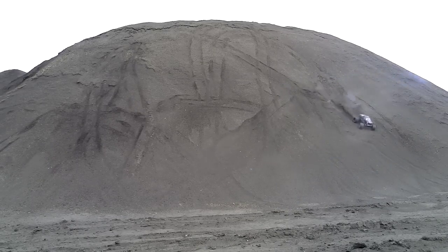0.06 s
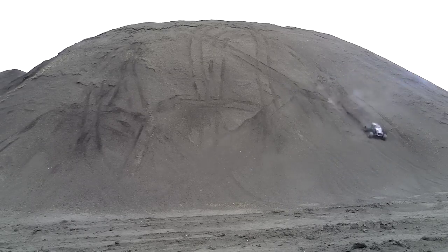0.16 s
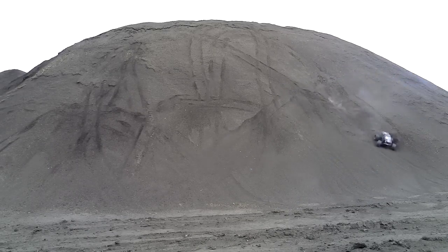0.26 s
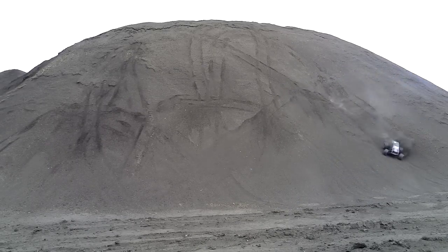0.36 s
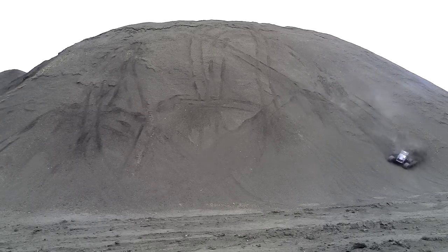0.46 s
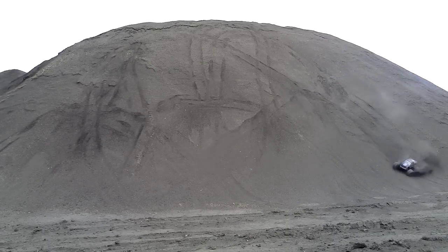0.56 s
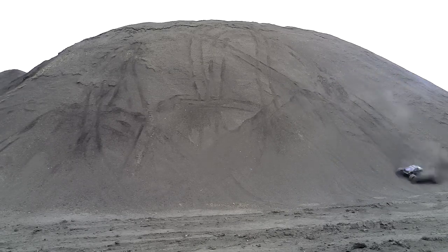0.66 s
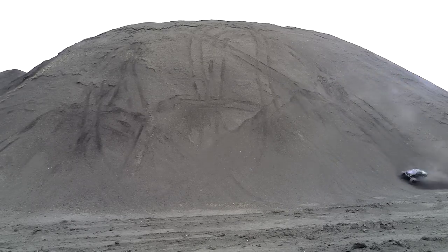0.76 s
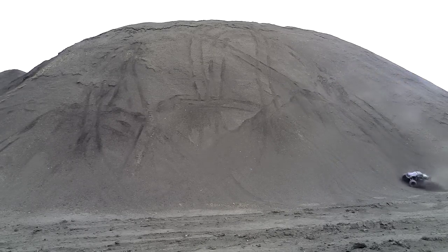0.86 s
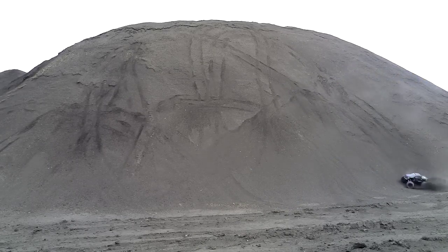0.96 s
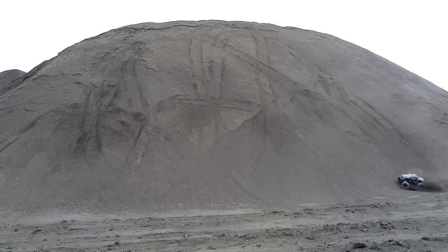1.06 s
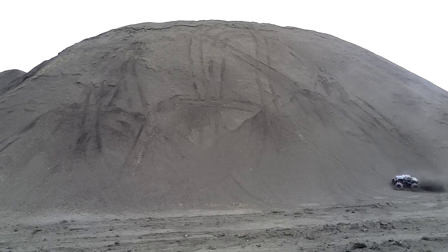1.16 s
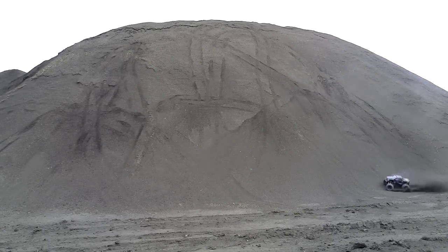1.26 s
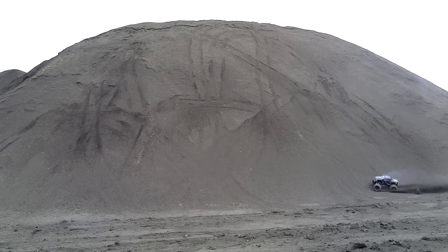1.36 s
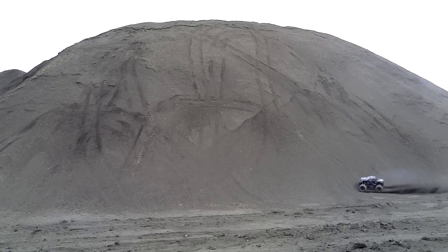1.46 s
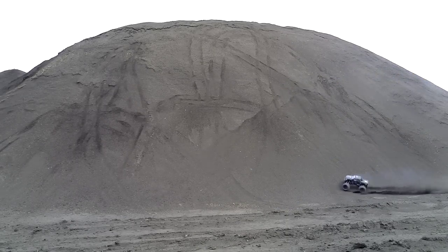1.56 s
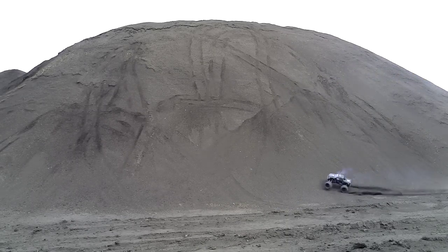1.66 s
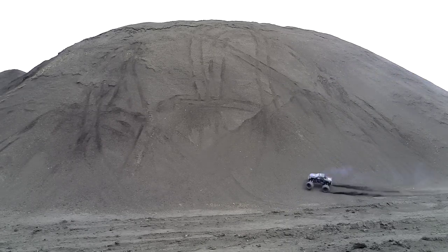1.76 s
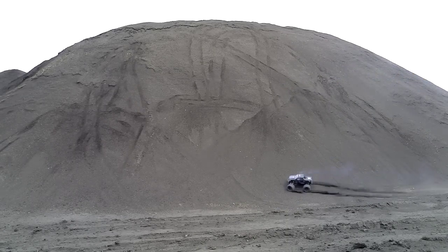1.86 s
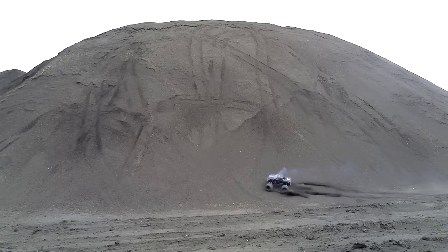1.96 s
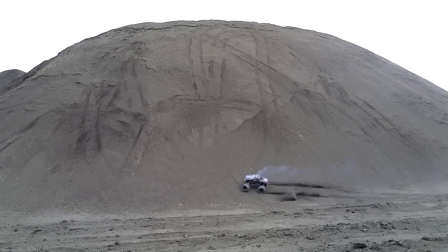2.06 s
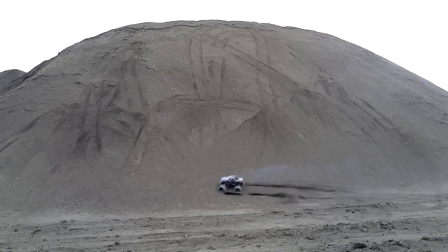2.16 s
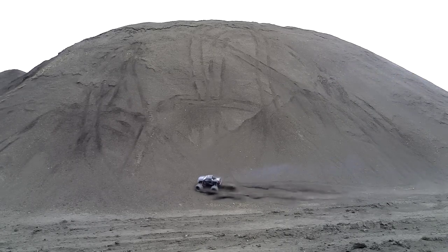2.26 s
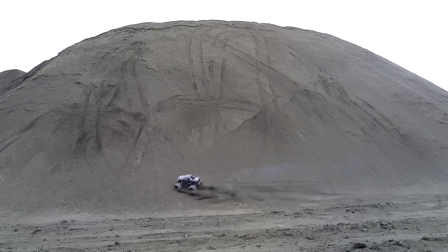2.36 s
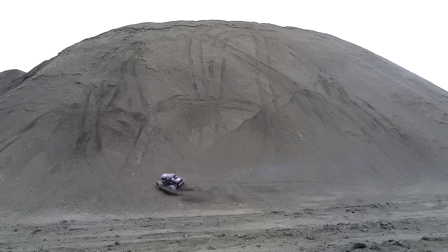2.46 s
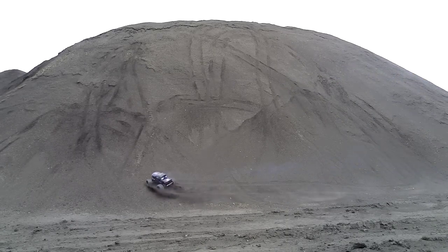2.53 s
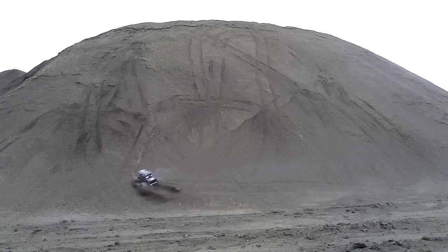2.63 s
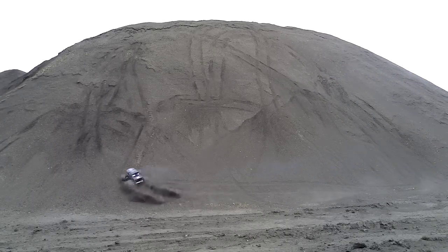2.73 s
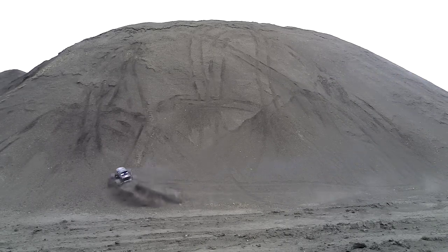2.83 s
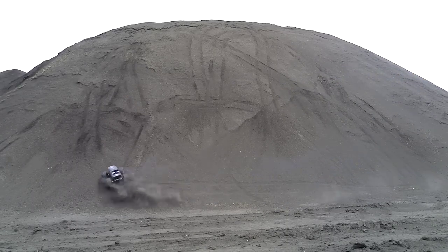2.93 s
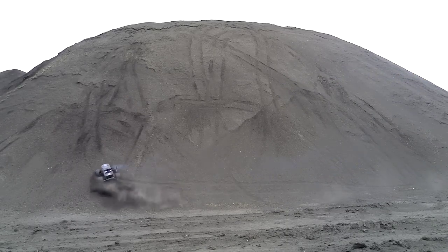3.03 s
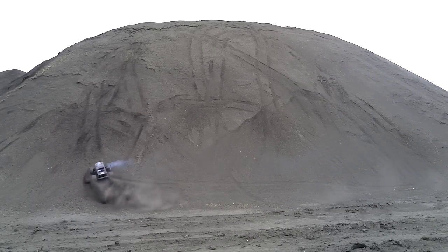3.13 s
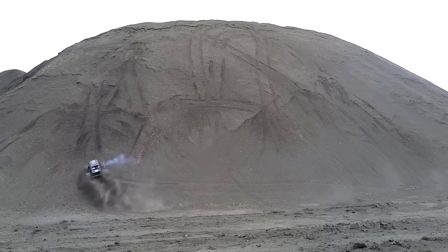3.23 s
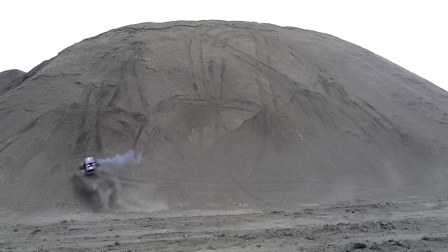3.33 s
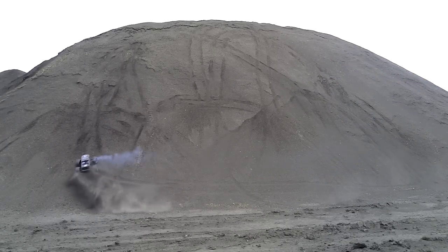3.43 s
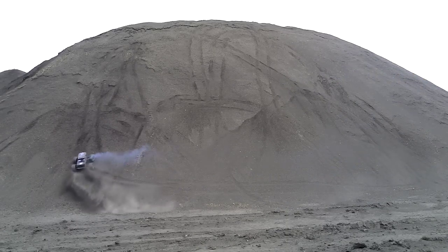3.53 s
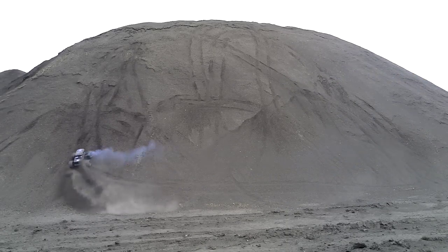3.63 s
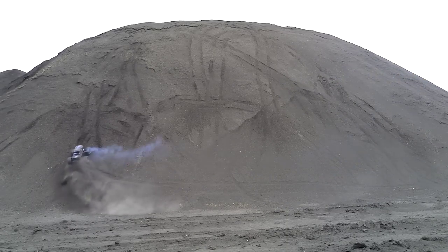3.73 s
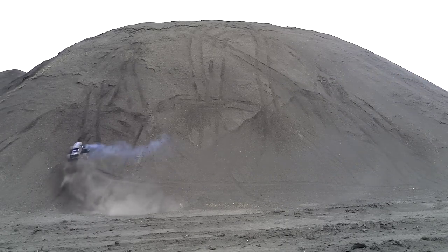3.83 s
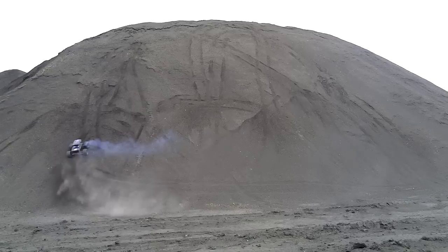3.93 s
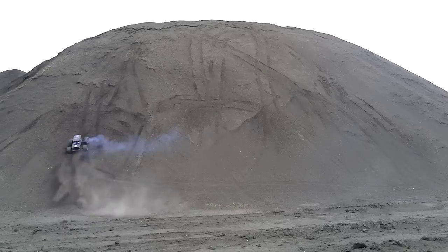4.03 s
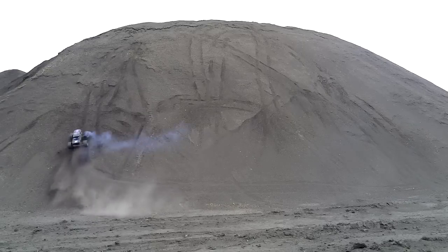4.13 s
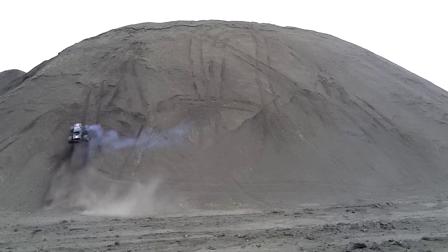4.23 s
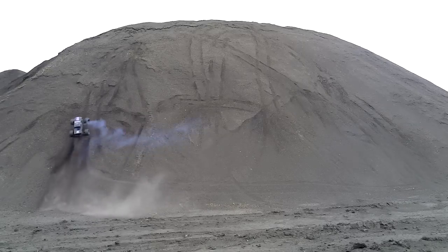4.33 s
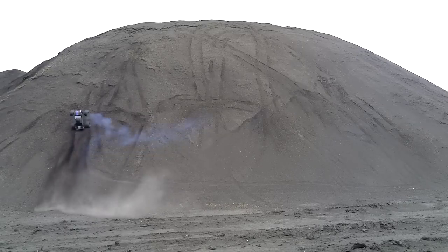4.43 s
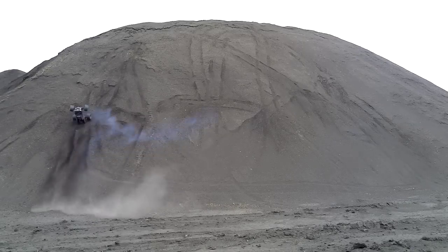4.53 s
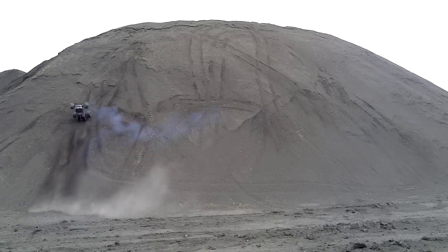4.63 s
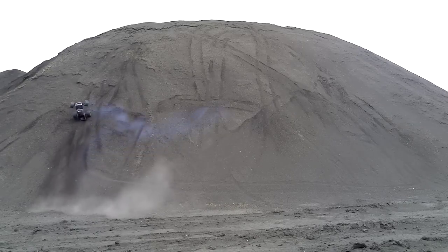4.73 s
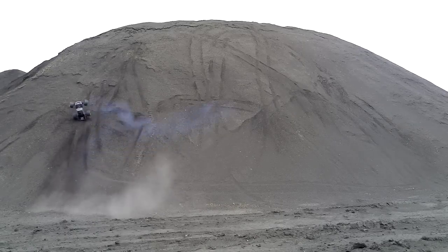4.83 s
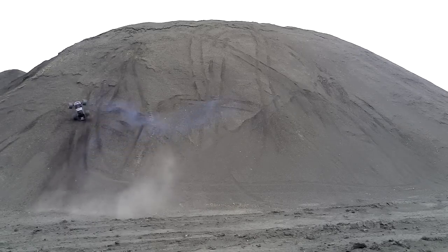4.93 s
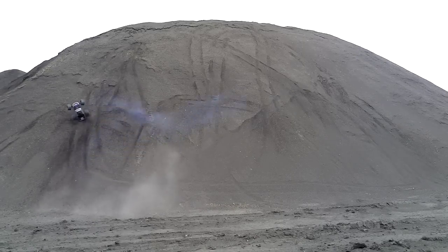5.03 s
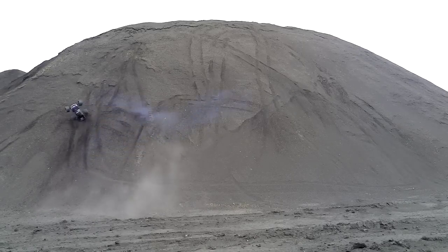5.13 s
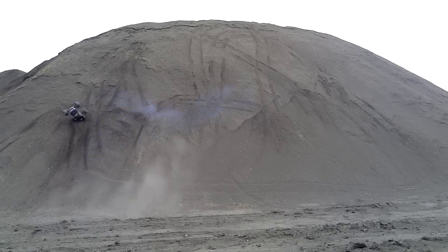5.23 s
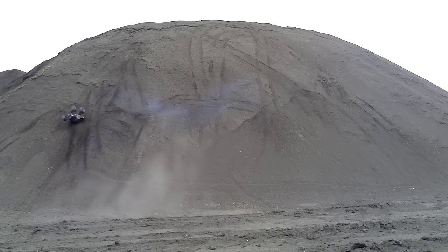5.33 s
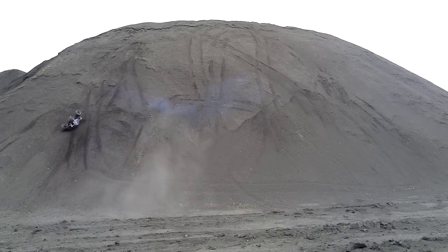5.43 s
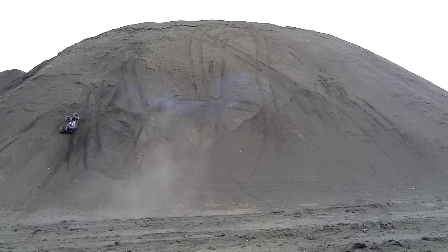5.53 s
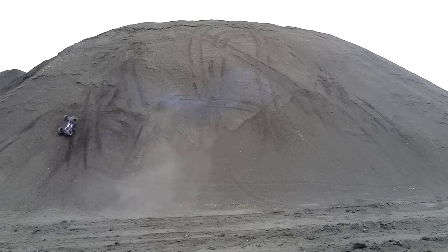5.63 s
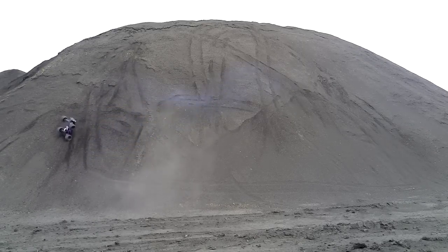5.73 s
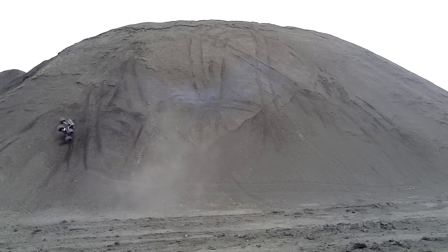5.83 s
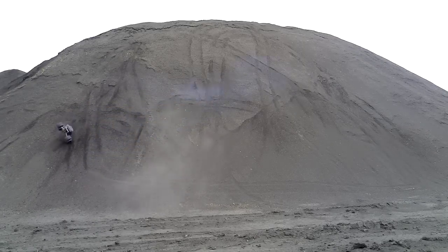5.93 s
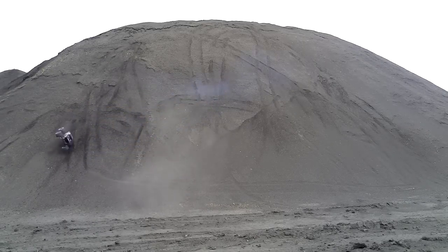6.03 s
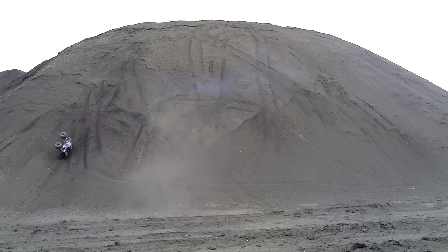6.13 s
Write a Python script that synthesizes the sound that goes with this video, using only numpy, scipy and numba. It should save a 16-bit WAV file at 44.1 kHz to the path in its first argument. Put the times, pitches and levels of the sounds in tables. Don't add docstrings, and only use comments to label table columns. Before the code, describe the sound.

A small two-stroke model truck engine buzzes and screams in raspy bursts across loose sand outdoors, cracks of grit, then drops to a quiet idle.

```python
import sys
import numpy as np
from scipy import signal
from scipy.fft import rfft, irfft, next_fast_len
from scipy.io import wavfile
from scipy.ndimage import uniform_filter1d, map_coordinates
from numba import njit

SR = 44100
rng = np.random.default_rng(int(sys.argv[2]) if len(sys.argv) > 2 else 0)


def dump(signal):
    limited = np.clip(np.atleast_2d(signal).T, -1, 1)
    pcm = np.round(limited * 32767).astype(np.int16)
    wavfile.write(sys.argv[1], SR, pcm)


def how_loud(loudness_db):
    steps = np.asarray(loudness_db, float) / 20
    return 10 ** steps


N = 272979
T = np.arange(N) / SR

# time in seconds, firing rate in Hz, gas hiss in dB.
LANDING = [(0.0, 303.4, -21), (0.044, 317, -19.5), (.102, 318.7, -24), (.172, 265.2, -27.5)]
# [s, Hz, dB].
SPIN_1 = [(.89, 278.7, -23), (0.989, 270.5, -29), (1.08, 292, -21), (1.26, 314, -16.5), (1.302, 336, -16),
          (1.377, 334, -16.5), (1.435, 343.2, -13), (1.482, 336.9, -16.5)]
SPIN_2 = [(1.58, 309.4, -20.5), (1.671, 321, -17.5), (1.782, 356.7, -13)]
SPIN_3 = [(1.873, 286.5, -17), (1.956, 298.2, -17.5), (1.98, 326.1, -18), (2.098, 380.4, -15),
          (2.21, 358.8, -14)]
# [s, Hz, dB].
BLIP = [(2.61, 278.3, -20), (2.66, 287, -19.5), (2.715, 279.4, -20), (2.799, 244.4, -27)]
CLIMB = [(2.873, 264.4, -22), (2.986, 268.7, -23.5), (3.24, 346.7, -19), (3.4, 369.3, -17),
         (3.442, 394.2, -16.5), (3.574, 432.6, -17)]
SCRABBLE = [(3.714, 382, -15.5), (3.889, 440.4, -16), (4.073, 418.7, -18), (4.168, 372, -19.5),
            (4.235, 420, -19), (4.295, 393.1, -20), (4.502, 406, -21), (4.54, 355, -20.5),
            (4.607, 351.7, -26)]
COAST_S = [.045, .45, 0.596, .065, 0.2884, .6, .19]
# time in seconds, firing rate in Hz, gas hiss in dB.
IDLE = [(.26, 198.8, -33.5), (.7, 194.7, -37), (.8, 198.4, -36.5), (2.5, 192.8, -29.5), (5.16, 206.6, -42),
        (5.263, 192, -45.5), (5.51, 192, -44), (5.75, 194, -36.5), (6.1, 191.5, -40)]
# time in seconds, rise in %.
HOPS = [(0.079, 7.6), (1.289, 2.3), (1.349, 5.7), (1.416, 5.4), (1.474, 21.5), (1.767, 3.6), (1.92, 13.5),
        (1.973, 9.5), (2.023, 6), (2.078, 3.17), (2.149, 9.7), (2.253, 4.42), (2.703, 6.75), (3.906, 2.61),
        (4.248, 6.6), (4.32, 3.04), (4.422, 5.2)]
# time in seconds, drop in dB.
CHOKES = [
    (.175, 9),
    (1.502, 17),
    (1.84, 31),
    (2.21, 23),
    (2.31, -2),
    (3.24, 5),
    (3.71, 10),
    (2.74, 8.5),
    (4.629, 4),
]
# time in seconds, first order, second order and orders 3-8,
# each in dB over the gas hiss.
MOUTH = [(0, -13, -7, -4), (.26, -18.5, -12.5, -6), (.75, -19, -5.5, -5), (.92, -8.5, 2, -6),
         (1.28, -18, -3.5, -11), (1.6, -13, -4, -8), (1.75, -25.5, -4.5, -13.5), (1.96, -13, -1, -11),
         (2.12, -13.5, -16, -8), (2.4, -28, -18, -14.5), (2.65, -13.5, -5, -11.5), (3.0, -10.5, -12.5, -7),
         (3.6, -9.5, -19.5, -1.5), (4.33, -11, -12.5, -3), (4.54, -30, -7, -4.5), (4.72, -12.5, -14, -1),
         (5.4, -22, -24, 4), (6.1, -17, -13.5, 2)]
# time in seconds, pipe overtone in Hz, its lift in dB,
# second overtone in Hz, its lift in dB.
HEADING = [(0, 890, 1, 2360, 2), (.25, 1350, 18, 1020, -2), (.8, 1360, 13, 1000, 11),
           (.9, 797, 4, 2460, 9.5), (1.15, 1107, 21, 3173, 3.5), (1.45, 1040, 10, 3290, 7),
           (1.75, 1012, 10, 3076, 2), (2.1, 1130, -2, 2300, -3), (2.5, 1408, 9, 2230, 9),
           (2.65, 1130, 2, 2600, 13), (2.95, 1395, 9, 2386, 12), (3.3, 1842, 4, 2240, -1.5),
           (3.52, 1760, 20.5, 2801, 12), (4.05, 1715, 6, 2160, 4), (4.3, 1704, 1, 2058, 10),
           (4.55, 1072, 9, 1802, -4), (4.8, 1053, 6, 1789, 8), (5.4, 866, 19, 1355, 3),
           (6.19, 939.4, 20.5, 1335, 18)]
# time in seconds, null in Hz, depth in dB.
BOUNCE = [(0, 1310, 5), (.8, 1130, 24), (.92, 1996, 8), (1.45, 2100, 7.5), (2.1, 1450, 5.5), (2.65, 870, 1),
          (3.6, 605, 17), (5.05, 495, -10.5), (5.5, 1159, 8)]
# time in seconds, hiss centre in Hz, top hiss in dB,
# rasp of the high orders in dB.
JET = [(0, 5200, 6.5, -8.5), (.25, 3060, 1, -9.5), (.8, 2830, -4.5, -21), (.95, 5430, 11, -5),
       (1.45, 5200, 0, -23.5), (1.78, 3204, -5.5, -12), (2.1, 2978, 2.5, -13), (2.5, 3043, -6, -27),
       (2.65, 2773, 3, -12.5), (2.85, 5340, -2.5, -19), (3.3, 5800, 5.5, -8.5), (3.8, 6266, 4, -8.5),
       (4.3, 5592, 6, -7.5), (5.5, 5600, 6, -9), (5.65, 3204, 1, -14), (6.19, 3950, 1.5, -12)]
# frequency in Hz, density in dB per Hz.
GAS = [(100, -72), (250, -17), (420, -10), (700, -5.5), (1200, -8), (2000, -1), (3000, -2), (5000, -3.5),
       (7000, -2.5), (8500, -6), (11000, -8.5), (13000, -12.5), (15500, -24)]
# time in seconds, grip 0-1; with grip one turn is like the last and less sand is churned.
GRIP = [(0, .4), (.15, .2), (1.2, .36), (1.4, .2), (2.3, .15), (3.1, .4), (3.5, .46), (4.4, .44),
        (4.58, .12), (6.19, .28)]
# time in seconds, peak in dB, centre in Hz, sharpness Q, t60 in seconds.
CRACKS = [
    (1.639, -6.5, 4320, 1.83, 0.022),
    (1.998, -2.5, 4000, 1, 0.045),
    (2.586, -32, 3025, 1.5, .03),
    (5.233, -31, 6508, 2.14, 0.037),
    (5.31, -27, 6470, 3.1, 0.031),
    (5.577, -24, 1476, 0.63, .012),
    (5.588, -22.5, 1997, 0.8, 0.14),
    (5.9108, -9.5, 4356, 0.97, 0.024),
    (5.914, -33, 3020, 0.75, 0.071),
]
# time in seconds, peak in dB, pitch in Hz, t60 in seconds.
THUDS = [
    (.135, -28, 198, 0.025),
    (.85, -47, 119.9, 0.083),
    (.172, -16, 242, 0.019),
    (.4, -40, 120, .04),
    (1.995, -42, 109, .04),
    (5.16, -29, 645, 0.038),
    (5.368, -22.5, 313.3, 0.027),
    (5.5, -35.5, 230, 0.059),
    (5.91, -43, 120.4, 0.036),
]
# pitch in Hz, width in Hz, start and end in seconds, level in dB.
BELL = [
    (6904, 76, 5.15, 5.6, -39.5),
    (5820, 96, 3.91, 5.44, -41),
    (5280, 144, 4.056, 5.56, -43),
    (6480, 82, 3.44, 3.944, -24.5),
    (5800, 340, 0.93, 1.59, -21),
]
# frequency in Hz, density in dB per Hz.
AIR = [(150, -19), (330, -3.5), (900, 1), (2000, -2), (4000, -10), (7000, -2.5), (9000, -24), (15500, -18)]
# frequency in Hz, density in dB per Hz.
RUMBLE = [(20, 2), (45, -8), (80, -31), (130, -4.5), (200, 8), (400, -21)]
# time in seconds, left minus right in dB, left lag in samples.
BEARING = [(0, 2, 2.33), (1.45, 3, 2.7), (1.7, 2.5, 0.32), (6.19, 2, .05)]
# frequency in Hz, left minus right in dB.
PORT_BALANCE = [(60, -6), (200, 7.5), (380, 5.5), (700, 2), (2400, 1.5), (4400, 3.5), (6500, -2.5),
                (9000, 4), (13000, -2)]
# frequency in Hz, angle in radians.
PORT_PHASE = [(300, 0.064), (4500, 0.49), (6500, 0.7), (7600, 2.2), (15000, 1.42)]
# frequency in Hz, share 0-1.
SCATTER = [(100, .3), (400, .02), (1500, .03), (3500, .05), (6500, .09), (10000, .14), (15000, .36)]


def level(x, db):
    return x * how_loud(db) / np.sqrt(np.mean(x ** 2))


def along(table, hz):
    points = np.array(table)
    return np.interp(np.log(hz + 1), np.log(points[:, 0]), points[:, 1])


def curves(table):
    points = np.array(table)
    return [np.interp(T, points[:, 0], column) for column in points.T[1:]]


def bump(hz, centre_hz, db, octaves):
    return db * np.exp(-(np.log2(hz / centre_hz) / octaves) ** 2)


def walk(rate):
    hold = int(SR / rate)
    steps = np.repeat(rng.standard_normal(N // hold + 1), hold)
    return 1.3 * uniform_filter1d(uniform_filter1d(steps, hold), hold)[:N]


def shape(x, gain):
    size = next_fast_len(N)
    return irfft(rfft(x, size) * gain(np.arange(size // 2 + 1) * SR / size), size)[..., :N]


@njit
def svf(x, hz, q):
    y, b, l = np.empty(len(x)), 0., 0.
    for i in range(len(x)):
        g = np.tan(np.pi * hz[i] / SR)
        v = (b + g * (x[i] - l)) / (1 + g * (g + 1 / q))
        b, l, y[i] = 2 * v - b, l + 2 * g * v, v / q
    return y


@njit
def repeat(x, period, share):
    y = np.zeros(len(x))
    for i in range(len(x)):
        at = i - period[i]
        k = int(at)
        y[i] = x[i] + (share[i] * (y[k] + (at - k) * (y[k + 1] - y[k])) if k >= 0 else 0.)
    return y


def throttle():
    idle = np.array(curves(IDLE))
    state = idle
    for pull, coast_s in zip((LANDING, SPIN_1, SPIN_2, SPIN_3, BLIP, CLIMB, SCRABBLE), COAST_S):
        left = np.exp(-np.maximum(T - pull[-1][0], 0) / coast_s)
        fade = np.clip((T - pull[0][0]) / .08 + 1, 0, 1)
        state = state + fade * (idle + left * (np.array(curves(pull)) - idle) - state)
    return state


def wheel_hops(hz, load):
    judder = [(3.055 + k * .0638, 6. * np.sin(np.pi * (k + 1) / 10)) for k in range(9)]
    flare = sum(rise / 100 * np.exp(-.5 * ((T - s) / .013) ** 2) for s, rise in HOPS + judder)
    ruts = 1 + .014 * load * walk(40) + .0045 * walk(150)
    return uniform_filter1d(hz, 600) * np.exp(flare) * ruts


def orders(hz, phase, first_db, second_db, upper_db, rasp_db, load, heading):
    pipe_hz, pipe_db, next_hz, next_db, null_hz, null_db = heading
    first = how_loud(first_db + 3.1 * load * walk(25.02) + 0.94 * walk(110))
    second = how_loud(second_db + 1.44 * load * walk(24.896) + 2.0 * walk(110))
    out = np.sqrt(2) * (first * np.sin(phase) + second * np.sin(2 * phase + 1.))
    lift = []
    for k in range(3, 14):
        overtones_db = bump(k * hz, pipe_hz, pipe_db, .18) + bump(k * hz, next_hz, next_db, 0.13)
        lift.append(how_loud(overtones_db - bump(k * hz, null_hz, null_db, 0.18)))
    share = np.sqrt(sum(v ** 2 for v in lift[:6]))
    for k in range(3, 31):
        near = np.clip((12 - k) / 5, 0, 1)
        body = near * how_loud(upper_db + 1.5) / share + (1 - near) * how_loud(rasp_db + along(GAS, k * hz))
        body = body * (lift[k - 3] if k < 14 else 1)
        body = body / (1 + (k * hz / 7300) ** 16)
        shimmer_db = (.4 + 2.6 * load) * min(k / 6, 1.5) * walk(24) + (1.2 + load) * walk(80)
        wander = .9 * walk(15) + (.08 + .1 * load) * max(k - 4, 0) * walk(45)
        out += body * how_loud(shimmer_db) * np.sin(k * phase - .12 * k * k + wander)
    return out


def gas(puffs, period, patches, gas_db, upper_db, centre_hz, top_db, null_hz, null_db):
    noise = repeat(rng.standard_normal(N) * puffs, period, curves(GRIP)[0])
    hiss = level(shape(noise, lambda hz: how_loud(along(GAS, hz))), 0)
    hiss = hiss + sum((gain - 1) * svf(hiss, np.full(N, hz), 17.4) for hz, gain in patches)
    top = shape(hiss, lambda hz: 1 / (1 + (8000 / (hz + 1)) ** 8))
    low = shape(hiss, lambda hz: 1 / (1 + (hz / 1900) ** 4))
    beam = svf(hiss, centre_hz, 2.7)
    low_gain = how_loud(.5 * (upper_db - gas_db + 12.5))
    hiss = 0.64 * (hiss + (how_loud(top_db) - 1) * top + (low_gain - 1) * low) + 0.54 * beam
    bounced = (1 - how_loud(-np.abs(null_db))) * svf(hiss, null_hz, 1.24)
    return (hiss - bounced) * how_loud(gas_db - .5)


def tyres(gas_db):
    centre_hz = np.full(N, 400.)
    roar = svf(svf(rng.standard_normal(N), centre_hz, 2.9), centre_hz, 2.9)
    churn_db = -19 - 13.5 * curves(GRIP)[0] + 2.0 * walk(30)
    slowing_db = 30 * np.clip((T - 4.55) / 0.072, 0, 1)
    return level(roar, 0) * how_loud(gas_db + churn_db - slowing_db)


def knocks():
    out = np.zeros(N)
    age = np.arange(4000) / SR
    for s, db, hz, q, t60 in CRACKS:
        centre_hz = np.full(len(age), 1. * hz)
        burst = svf(rng.standard_normal(len(age)) * how_loud(-60 * age / t60), centre_hz, 1. * q)
        burst = svf(burst, centre_hz, 0.32)
        out[int(s * SR):][:len(age)] += how_loud(db) * burst / np.abs(burst).max()
    for s, db, hz, t60 in THUDS:
        swing = np.sin(2 * np.pi * hz * age) * np.minimum(age * hz, 1)
        out[int(s * SR):][:len(age)] += how_loud(db - 60 * age / t60) * swing
    return out


def bell():
    out = 0
    for hz, width_hz, start, end, db in BELL:
        ring = svf(rng.standard_normal(N), np.full(N, 1. * hz), hz / width_hz)
        swell = np.sin(np.pi * np.clip((T - start) / (end - start), 0, 1))
        out = out + level(ring, db) * swell * how_loud(2.4 * walk(30))
    return out


def open_air():
    noise = shape(rng.standard_normal((2, N)), lambda hz: how_loud(along(AIR, hz)))
    return level(noise, -40) * how_loud(2.5 * walk(3.12))


def low_rumble(gas_db):
    noise = shape(rng.standard_normal((2, N)), lambda hz: how_loud(along(RUMBLE, hz)))
    return level(noise * how_loud(4.5 * walk(11) + 0.081 * gas_db), -60)


def ports(sharp, hiss, loose, pan_db, lag):
    side = np.array([[.5], [-.5]])
    share = lambda hz: np.clip(along(SCATTER, hz), 0, 1)
    mid = sharp + shape(hiss, lambda hz: np.sqrt(1 - share(hz)))
    late = map_coordinates(mid, [np.arange(N) - lag], order=3, mode="nearest")
    both = np.array([late, mid]) + 2 * side * shape(loose, lambda hz: np.sqrt(share(hz)))
    tone = lambda hz: how_loud(side * along(PORT_BALANCE, hz)) * np.exp(1j * side * along(PORT_PHASE, hz))
    return shape(both, tone) * how_loud(side * pan_db)


def scene():
    hz, gas_db = throttle()
    first_db, second_db, upper_db = gas_db + np.array(curves(MOUTH))
    choke_db = sum(db * np.exp(-.5 * ((T - s) / 0.044) ** 2) for s, db in CHOKES)
    second_db = second_db - choke_db
    upper_db = upper_db - .22 * choke_db
    gas_db = gas_db - 0.0067 * choke_db
    centre_hz, top_db, rasp_db = curves(JET)
    rasp_db = gas_db + rasp_db - .5 * choke_db
    pan_db, lag = curves(BEARING)
    heading = curves(HEADING) + curves(BOUNCE)

    load = np.clip(hz / 200 - .7, 0, 1)
    hz = wheel_hops(hz, load)
    phase = 2 * np.pi * np.cumsum(hz) / SR
    turn = phase / (2 * np.pi)
    size = how_loud(1.4 * rng.standard_normal(N // 50))[turn.astype(int)]
    puffs = (1.4 + size * np.exp(-(turn % 1) / 0.72)) * how_loud(1.74 * walk(16))
    centre_hz = centre_hz * (1 + 0.0057 * walk(10))
    patches = [(band, how_loud(3.8 * walk(7))) for band in 1800 * 2 ** (np.arange(21) / 7)]
    hiss, loose = (gas(puffs, SR / hz, patches, gas_db, upper_db, centre_hz, top_db, *heading[4:])
                   for _ in range(2))
    air, loose_air = open_air()
    sharp = orders(hz, phase, first_db, second_db, upper_db, rasp_db, load, heading)
    sharp = sharp + knocks() + bell() + tyres(gas_db)
    return ports(sharp, hiss + air, loose + loose_air, pan_db, lag) + low_rumble(gas_db)


def low_pass(x):
    return signal.sosfilt(signal.butter(12, 15670, fs=SR, output="sos"), x)


def record(dry):
    def response(hz):
        slots = .98 * np.exp(-((hz - 7930) / 190) ** 4)
        slots = slots + .5 * np.exp(-((hz - 3950) / 30) ** 2)
        slots = slots + .6 * np.exp(-((hz - 11900) / 50) ** 2)
        return (1 - slots) * (hz < 15670)

    mix = np.clip(shape(dry, response) - .0028, -1, 1)
    return low_pass(mix)


dry = scene()
out = record(dry)
dump(out)
```